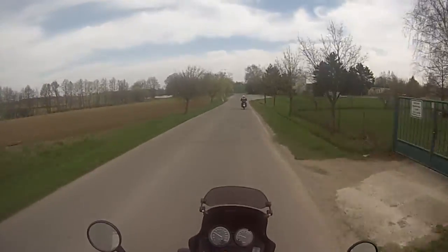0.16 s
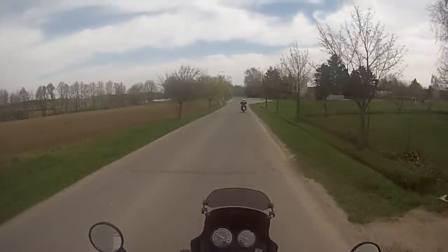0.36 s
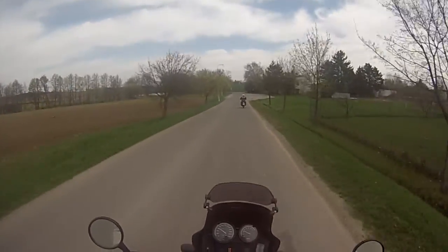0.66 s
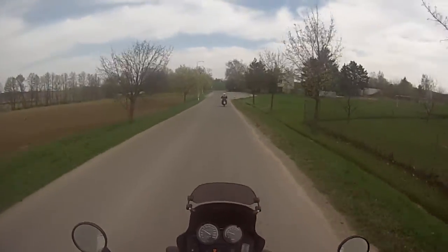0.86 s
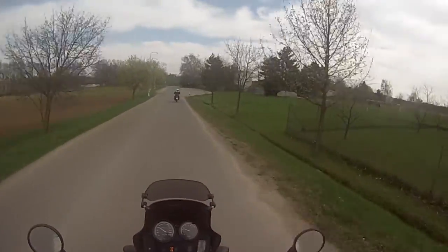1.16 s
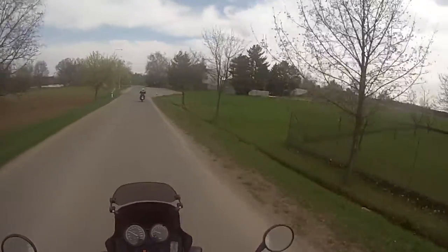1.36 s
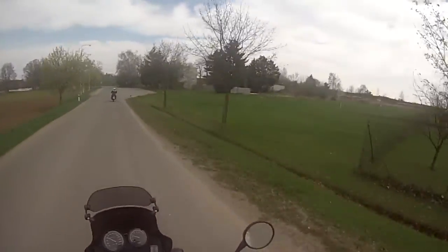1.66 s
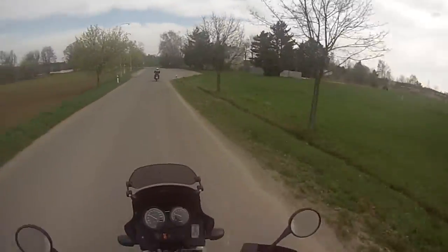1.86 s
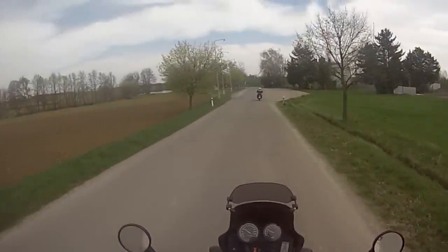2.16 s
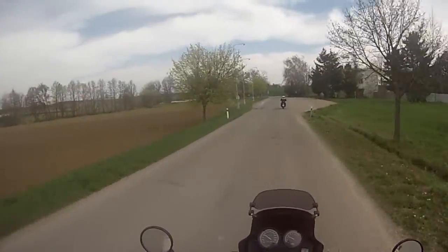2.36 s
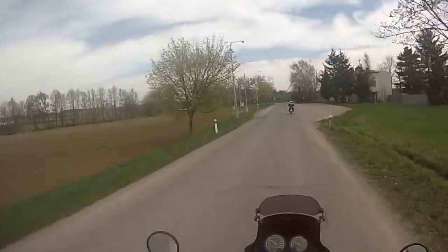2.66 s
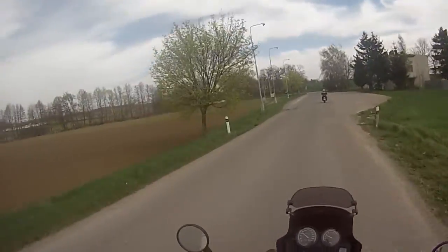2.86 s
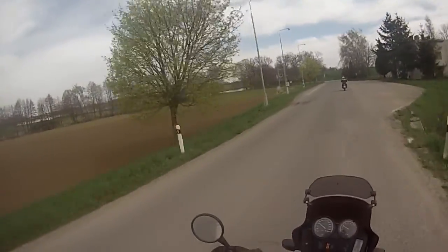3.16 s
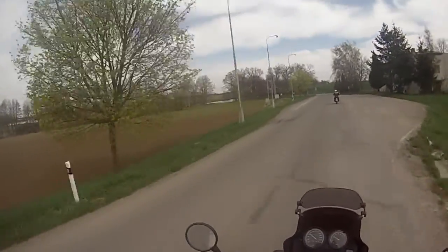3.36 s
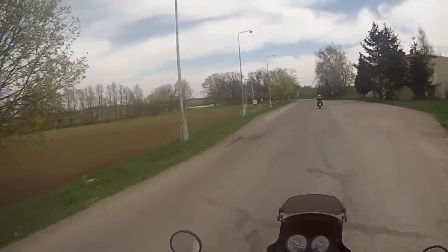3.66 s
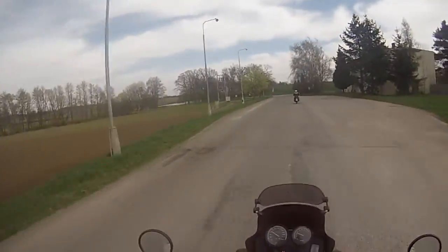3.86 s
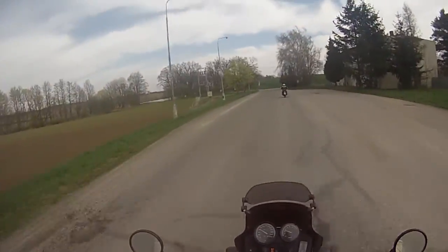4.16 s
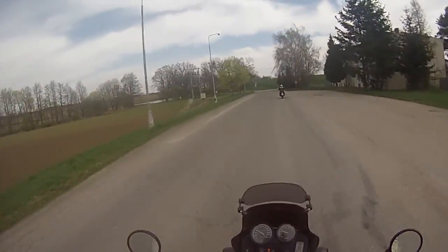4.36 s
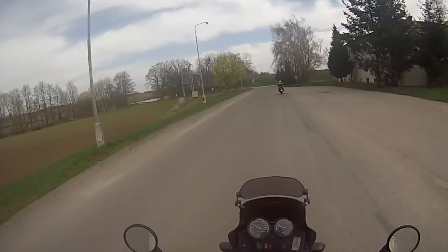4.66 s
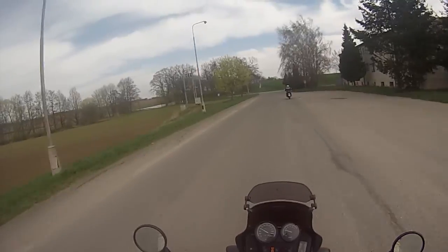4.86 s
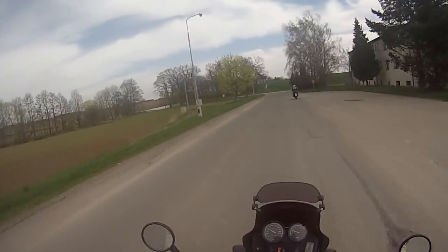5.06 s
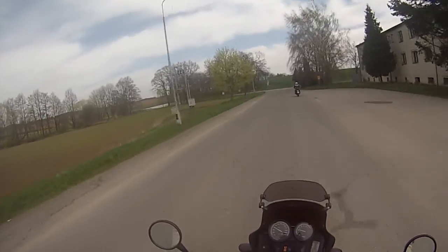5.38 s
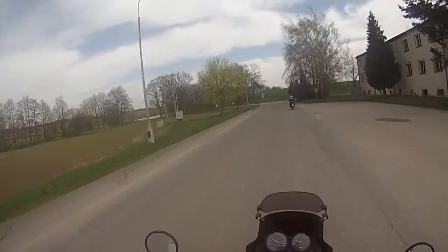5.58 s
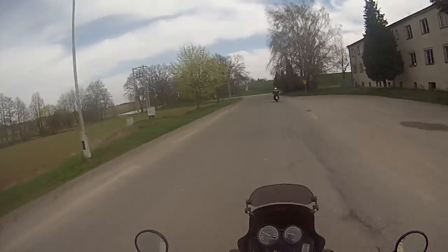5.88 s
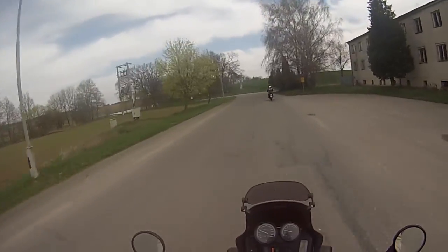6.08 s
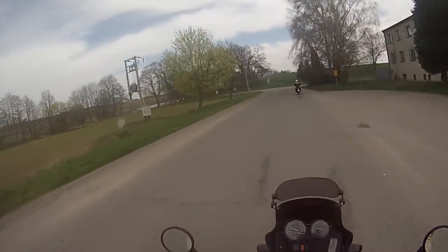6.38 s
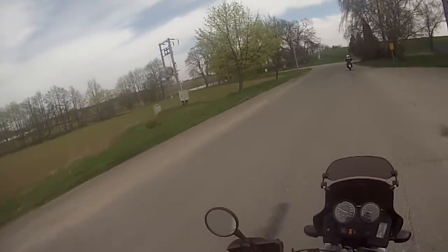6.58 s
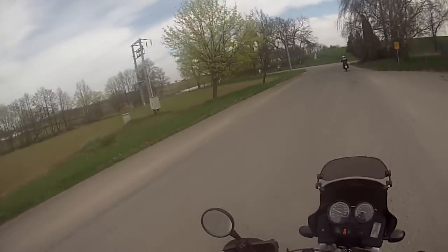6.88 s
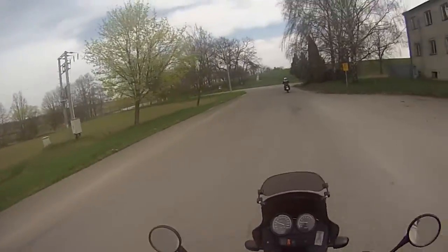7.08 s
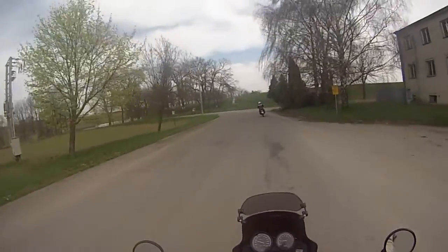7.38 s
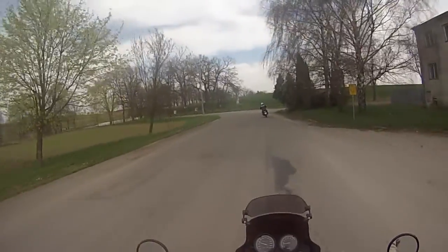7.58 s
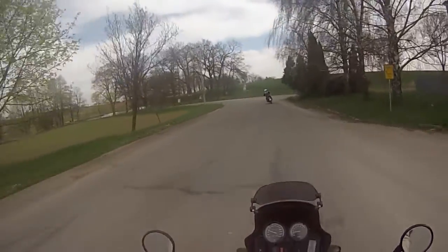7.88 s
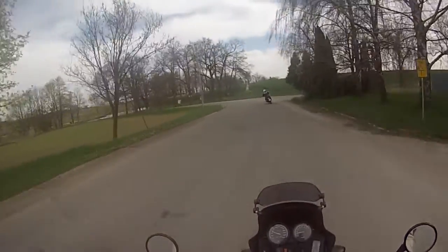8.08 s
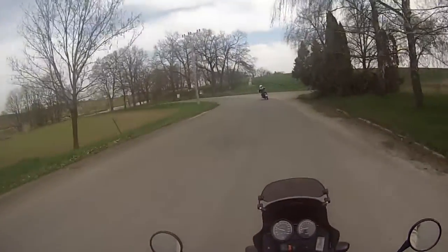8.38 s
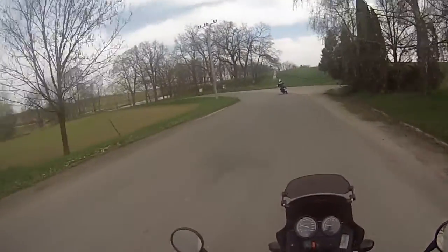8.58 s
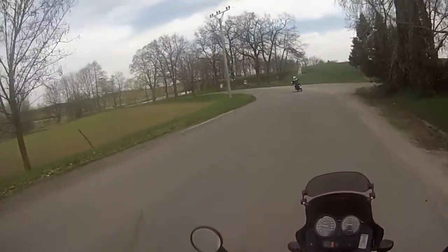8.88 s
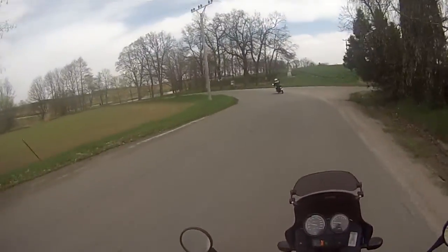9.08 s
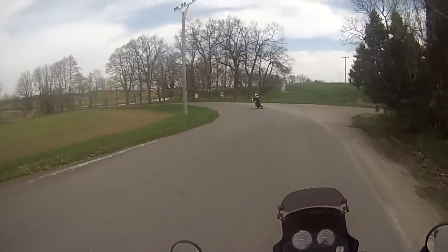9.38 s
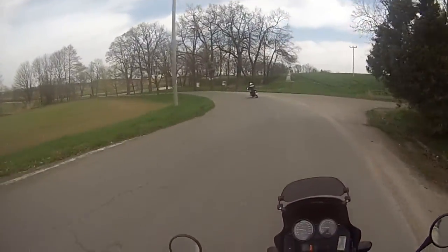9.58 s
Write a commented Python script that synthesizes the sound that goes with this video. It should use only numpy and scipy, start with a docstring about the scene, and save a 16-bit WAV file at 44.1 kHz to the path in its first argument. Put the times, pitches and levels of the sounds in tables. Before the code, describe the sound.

Close up on a moving motorcycle, a deep uneven engine drone around a low hum merges with booming, fluttering wind. Air roars, rushes and whistles breathily over the microphone, strongest in the first four seconds. A brief dull clatter jolts the mount around three and a half seconds. The airflow then weakens as the bike slows for a bend, though low gusts keep thumping. Open rural road, no echo.

```python
"""A motorcycle cruises along a country road, heard close up from a camera riding along in the airstream.
Uneven firings and wind buffets ring one deep resonance, with noise rumbling and flapping around it.
Air rushes and whistles round the camera case and hisses through its narrow resonances, all shaped noise,
easing as the bike slows for a bend. A knock rings short modes; a few faint squeaks are thin sine tones."""
import sys
import numpy as np
from scipy import signal
from scipy.fft import rfft, irfft, next_fast_len
from scipy.io import wavfile
from scipy.ndimage import uniform_filter1d

SR = 44100
rng = np.random.default_rng(int(sys.argv[2]) if len(sys.argv) > 2 else 0)


def put_to_file(sound):
    """Save the sound as 16-bit audio at rate SR, in the file named by the first command-line argument."""
    columns = np.atleast_2d(sound).T  # one column per channel
    safe = np.clip(columns, -1, 1)
    whole_steps = np.round(safe * 32767)
    wavfile.write(sys.argv[1], SR, whole_steps.astype(np.int16))


N = 429093

# strength of the big eddies that buffet the camera: time_s, drive_db
WAKE = [(0.0, 3.5), (1.45, 5.0), (2.25, 1), (2.65, 5), (2.95, 2.7), (3.55, 4.5), (4.4, -2), (4.6, -10),
        (4.9, -6.5), (5.2, 2), (6.1, -4), (7.5, -3.1), (8.1, 2.5), (8.6, -4.5), (9.73, -5)]
# gusts, some boom and some flap higher up: peak_s, length_s, boom_lift_db, buffet_lift_db
GUSTS = [(0.35, .1, 3.5, 3), (0.61, .11, 7.5, -3), (0.91, .12, 0.5, 3), (1.17, 0.086, 7.5, 1),
         (1.43, .07, 3.5, 2), (1.49, 0.1, 3, 7), (1.89, 0.19, 4, 0), (1.99, 0.075, 5.5, 10),
         (2.26, 0.078, 6, -8), (2.67, 0.3, 5.5, 4.5), (3.2, .09, 4, 5.5), (3.54, 0.19, 1, 8.5),
         (4.01, 0.32, 5, -4), (4.42, 0.23, 2, -1), (4.92, 0.15, 6, -2), (5.13, 0.12, 6.5, -3),
         (5.67, 0.14, 0, 6), (6.2, 0.2, 0, 5), (6.48, 0.2, 6, 4), (6.61, 0.15, 9.5, 0), (6.7, 0.14, 7, 6.5),
         (6.96, 0.17, 7.5, 3.5), (7.31, 0.1, 5, 5.5), (7.64, .17, 6.5, 3), (7.9, .05, 2, 8),
         (8.02, 0.11, 7, 5), (8.12, .07, 5, -1), (8.22, .13, 6.5, -2), (8.33, 0.07, 4, 0),
         (8.45, .08, 8.5, -2), (8.78, 0.15, 1, 8.5), (8.98, 0.1, 9.5, 0), (9.14, 0.23, 5, 0.5),
         (9.33, 0.25, 2.5, 7.5)]
# lulls, where the bass mostly drops for a moment: centre_s, length_s, change_db
LULLS = [(1.31, 0.058, -6), (2.44, 0.19, -2), (2.86, .12, -3), (3.3, .12, -4), (3.8, .14, -6),
         (4.25, 0.089, -19), (5.56, 0.11, -5), (5.73, .08, -4), (6.09, .08, -4), (6.85, 0.21, -6),
         (7.43, 0.2, -4), (7.76, 0.15, -1), (8.38, 0.075, -10), (8.6, .16, 2), (8.87, 0.092, -10),
         (9.05, .07, -9)]
# strength of the airflow over the case, shared by all its voices: time_s, drive_db
FLOW = [(0.0, 2.5), (1.3, 7), (1.75, 4), (2.4, 4), (2.68, 5.5), (2.92, 3.5), (3.15, 5.5), (3.5, 5.2),
        (3.75, 1), (4.2, 1), (4.9, -2.3), (5.27, 0.9), (5.95, -7.5), (6.42, -6.5), (6.78, -6), (7.3, -2.5),
        (7.46, -6.2), (7.54, -1.5), (8.15, -2), (8.6, -4), (9.2, -4.0), (9.73, -7)]
# puffs that strengthen the airflow, and slack moments that weaken it: peak_s, length_s, change_db
PUFFS = [(0.14, 0.19, 3), (1.33, .14, 1), (1.95, 0.23, 5), (2.42, 0.1, -2.5), (4.0, .08, 2.5),
         (4.5, 0.15, -2), (4.7, 0.18, 1), (5.06, 0.11, 2.5), (5.79, 0.13, 3), (6.48, .08, 1),
         (6.53, .06, -3), (6.63, 0.18, 2), (6.78, .1, -2), (6.97, .17, 2), (7.15, .08, -1.5),
         (7.26, .06, 1.5), (8.17, 0.14, 3.5)]
# edge whistle, which speaks when the air meets it at the right angle: time_s, level_db before its law
SLANT = [(0.0, -38.5), (0.9, -40), (1.6, -37.5), (2.0, -40), (2.3, -33), (2.6, -35.9), (3.75, -32),
         (4.15, -35), (5.1, -34), (5.75, -37), (6.1, -40), (8.2, -39.0), (9.73, -37)]
# thin ring from the gaps, which also wanders on its own: time_s, level_db before its law
THIN = [(0.0, -46), (0.3, -42.7), (0.8, -45.7), (1.4, -48), (1.8, -50.0), (3.15, -47.9), (3.6, -50.5),
        (5.2, -47), (5.65, -50.8), (6.15, -43.7), (6.75, -50.5), (7.4, -44.3), (8.5, -48), (9.73, -50.5)]

# colours of the airflow, relative density before levelling: pitch_hz, density_db (per Hz)
RUMBLE_COLOUR = [(12, -12), (26, -4.5), (45, -6), (72, -2.5), (100, -6), (150, -49)]
BUFFET_COLOUR = [(90, -13), (135, 0.5), (160, -0.5), (182, 2), (215, -4.5), (245, -9.5), (275, -10),
                 (330, -38), (600, -49)]
ROAR_COLOUR = [(200, 4.5), (290, 6), (410, 6.5), (460, 0), (700, -1.5), (920, -3.5), (1150, -4),
               (1700, -23)]
RUSH_COLOUR = [(850, -35), (1120, -8.5), (1250, -6.5), (1360, -1), (1610, 0), (1710, -5), (1860, -2.5),
               (2040, -10), (2620, -11.5), (2730, -15.5), (2800, -37), (3600, -29)]
SIZZLE_COLOUR = [(2000, -18), (2850, 1), (3300, -0.5), (3950, -0.5), (4350, -7), (4620, -2.5), (5200, -6.5),
                 (6000, -35)]
HISS_COLOUR = [(4000, -8.5), (5400, 2), (5900, 1.5), (6100, -3), (6550, -0.5), (7300, -6.5), (8150, -7.5),
               (8400, -9.5), (9000, -10), (9450, -15), (12000, -18.5), (13000, -26), (15000, -32)]
FLOOR_COLOUR = [(3000, 13), (9000, -13), (12000, -2), (13000, -9), (15000, -12)]  # steady fine hiss
# modes of the case, which colour the broad airflow: pitch_hz, width_hz, lift_db
CASE_MODES = [(387, 38, 3), (651, 50, 3.5), (812, 62, 7.5), (2681, 63, 10), (3870, 90, 4), (6140, 110, 1.5),
              (6500, 160, 2.5)]
# narrow resonances, relative to each other: pitch_hz, width_hz, level_db
BOOM_MODES = [(103, 23, 0)]
WHISTLE_MODES = [(2274, 335, 0)]
RING_MODES = [(4880, 31, -3), (4930, 43, -3.5), (5083, 144, 1), (5195, 91, -4.5), (5274, 160, -7.5)]

# blows of the knock from a bump: start_s, strength_db
KNOCK_BLOWS = [(3.5535, -17), (3.557, -13), (3.561, -20)]
# short modes that each blow rings: pitch_hz, level_db, t60_s
KNOCK_MODES = [(126, 3, 0.045), (220, 0, 0.011), (326, -4, 0.034), (620, -10, 0.019), (774, -5, 0.013),
               (1090, -2.5, 0.015), (1500, -3, 0.014), (1850, -10, .008), (4050, -16, .01)]
# faint high squeaks: start_s, pitch_hz, length_s, level_db
SQUEAKS = [(3.95, 9280, .07, -67), (4.61, 9280, .08, -65), (6.25, 9270, .07, -71), (6.56, 9450, .06, -68),
           (6.82, 9430, .06, -66), (7.03, 9400, .06, -66), (7.34, 9280, .09, -70), (8.07, 9280, .08, -66),
           (9.45, 13750, .06, -76), (9.64, 13650, .06, -77)]

# how each voice follows its drive: level_db at zero drive, slope_db_per_db
BOOM_LAW, RUMBLE_LAW, BUFFET_LAW = (-30.5, 0.9), (-34.7, 0.9), (-38.5, 0.75)
ROAR_LAW, RUSH_LAW = (-42.5, 0.83), (-36, 0.8)
SIZZLE_LAW, HISS_LAW = (-46.5, 0.97), (-52.65, 1.16)
WHISTLE_LAW, RING_LAW = (-3, 0.89), (-1, 1.28)  # levels added to SLANT and THIN

FIRING_HZ = 102.63  # centre of the firing rate
TOP_HZ = 15100  # upper limit of the camera's sound


def undb(db):
    """Decibels to gain."""
    return 10 ** (np.asarray(db) / 20)


def curve(table):
    """Join the points of a two-column table by straight lines in time."""
    time_s, value = np.transpose(table)
    return np.interp(np.arange(N) / SR, time_s, value)


def swells(table):
    """Add smooth rises and falls, one per row; return one dB curve per level column."""
    t = np.arange(N) / SR
    out = np.zeros((len(table[0]) - 2, N))
    for peak_s, length_s, *change_db in table:
        on = np.abs(t - peak_s) < length_s / 2
        bump = np.cos(np.pi * (t[on] - peak_s) / length_s) ** 2
        out[:, on] += np.outer(change_db, bump)
    return out


def follow(law, drive_db):
    """Level in dB of a voice that grows as a power of its drive."""
    level_db, slope = law
    return level_db + slope * drive_db


def unit(x):
    """Scale to rms 1."""
    return x / np.sqrt(np.mean(x ** 2))


def even(x, span_s):
    """Hold the rms near 1 over a short span, keeping the quicker flutter."""
    span = max(int(span_s * SR), 64)
    return x / np.sqrt(uniform_filter1d(x ** 2, span) + 1e-18)


def walk(rate_hz):
    """Draw random levels at a given rate and slide between them; rms 1."""
    step = max(int(SR / rate_hz), 2)
    held = np.repeat(rng.standard_normal(N // step + 1), step)
    return unit(uniform_filter1d(held, step)[:N])


def noise():
    """White noise, the raw turbulence."""
    return rng.standard_normal(N)


def shaped(x, response):
    """Filter by a gain that is a function of frequency."""
    size = next_fast_len(N)
    hz = np.maximum(np.arange(size // 2 + 1) * SR / size, 1)
    return irfft(rfft(x, size) * response(hz), size)[:N]


def ring(x, modes):
    """Sound steep resonances side by side: each band-pass acts twice."""
    def response(hz):
        return sum(undb(level_db) / (1 + 1j * (hz - pitch_hz * pitch_hz / hz) / width_hz) ** 2
                   for pitch_hz, width_hz, level_db in modes)
    return shaped(x, response)


def airflow(colour):
    """Turbulence of a given colour, lifted at the modes of the case; rms 1."""
    pitch_hz, density_db = np.transpose(colour)

    def response(hz):
        lift = sum(lift_db / (1 + (2 * (hz - centre_hz) / width_hz) ** 2)
                   for centre_hz, width_hz, lift_db in CASE_MODES)
        base = np.interp(np.log(hz), np.log(pitch_hz), density_db, left=-90, right=-90)
        return undb(base + lift)
    return unit(shaped(noise(), response))


def firings(wander=0.03, scatter_db=4):
    """One pulse per engine firing, uneven in timing (share of the rate) and strength; rms 1."""
    phase = np.cumsum(FIRING_HZ * (1 + wander * walk(25))) / SR
    pulses = np.diff(np.floor(phase), prepend=0)
    return unit(pulses * undb(scatter_db * walk(100)))


def boom(level_db, engine_db=-6):
    """Firings and wind buffets together ring the deep resonance; engine_db is firings against wind."""
    drive = noise() + undb(engine_db) * firings()
    return even(ring(drive, BOOM_MODES), span_s=0.084) * undb(level_db)


def rumble(level_db):
    """Big eddies roll past as deep noise."""
    return even(airflow(RUMBLE_COLOUR), span_s=0.073) * undb(level_db)


def buffets(level_db, flap_db=1.8):
    """Eddies flap at the camera: low noise with quick random changes of level."""
    return even(airflow(BUFFET_COLOUR), span_s=0.08) * undb(level_db + flap_db * walk(70))


def drone(rumble_share=0.3, lull_share=0.56, throb_db=2, rumble_flutter_db=1.5, buffet_flutter_db=1.33):
    """Boom, rumble and buffets ride on one wake; each takes its share of gusts and lulls."""
    wake = curve(WAKE)
    thud, flap = swells(GUSTS)
    lull, = swells(LULLS)
    boom_db = follow(BOOM_LAW, wake) + thud + lull + throb_db * walk(22)
    rumble_db = follow(RUMBLE_LAW, wake) + rumble_share * (thud + lull) + rumble_flutter_db * walk(14)
    buffet_db = follow(BUFFET_LAW, wake) + flap + lull_share * lull + buffet_flutter_db * walk(18)
    return boom(boom_db) + rumble(rumble_db) + buffets(buffet_db)


def roar_and_rush(flow, slant, roar_loss=0.43):
    """Air pours over the case; the roar loses dB per dB of slant as air turns to the whistling edge."""
    roar_db = follow(ROAR_LAW, flow) - roar_loss * slant
    rush_db = follow(RUSH_LAW, flow)
    return airflow(ROAR_COLOUR) * undb(roar_db) + airflow(RUSH_COLOUR) * undb(rush_db)


def edge_whistle(flow, edge_db, slant, swing=0.25, flutter_db=0.45):
    """Noise through one resonance whistles at an edge; swing adds dB per dB of slant."""
    level_db = follow(WHISTLE_LAW, flow) + edge_db + swing * slant + flutter_db * walk(14)
    return unit(ring(noise(), WHISTLE_MODES)) * undb(level_db)


def gap_ring(flow, flutter_db=1.0):
    """Air hisses through narrow resonances in the gaps of the case."""
    level_db = follow(RING_LAW, flow) + curve(THIN) + flutter_db * walk(20)
    return unit(ring(noise(), RING_MODES)) * undb(level_db)


def spray(flow):
    """The finest eddies sizzle and hiss, growing steeply with the flow."""
    sizzle = airflow(SIZZLE_COLOUR) * undb(follow(SIZZLE_LAW, flow))
    hiss = airflow(HISS_COLOUR) * undb(follow(HISS_LAW, flow))
    return sizzle + hiss


def wind(unrest_db=0.36, slow_flutter_db=0.5, quick_flutter_db=0.59, fine_flutter_db=0.19):
    """One flow drives every voice round the case, and its angle trades roar for whistle."""
    flow = curve(FLOW) + swells(PUFFS)[0] + unrest_db * walk(18)
    edge_db = curve(SLANT)
    slant = edge_db - edge_db.mean()
    broad = roar_and_rush(flow, slant) + edge_whistle(flow, edge_db, slant)
    # the finest eddies come and go on their own as well
    fine = (gap_ring(flow) + spray(flow)) * undb(fine_flutter_db * walk(20))
    together_db = slow_flutter_db * walk(26) + quick_flutter_db * walk(120)
    return (broad + fine) * undb(together_db)


def steady_hiss(level_db=-68):
    """A faint fine hiss of constant level lies under the ride."""
    return undb(level_db) * airflow(FLOOR_COLOUR)


def knock(soft_hz=3000):
    """A bump jolts the mount: a quick clatter of cushioned blows into short decaying modes."""
    t = np.arange(SR // 10) / SR
    body = np.zeros(len(t))
    for k, (pitch_hz, level_db, t60_s) in enumerate(KNOCK_MODES):
        decay = undb(level_db - 60 * t / t60_s)
        # neighbouring modes swing in opposite directions
        body += (-1) ** k * decay * np.sin(2 * np.pi * pitch_hz * t)
    blows = np.zeros(N)
    for start_s, strength_db in KNOCK_BLOWS:
        blows[int(start_s * SR)] += undb(strength_db)
    rung = signal.fftconvolve(blows, body)[:N]
    return shaped(rung, lambda hz: 1 / (1 + 1j * hz / soft_hz) ** 2)


def squeaks(waver=0.003):
    """Thin sine tones start quickly and fade, their pitch wavering by a small share."""
    t, out = np.arange(N) / SR, np.zeros(N)
    clock = np.cumsum(1 + waver * walk(150)) / SR
    for start_s, pitch_hz, length_s, level_db in SQUEAKS:
        on = (t > start_s) & (t < start_s + length_s)
        swell = np.sin(np.pi * np.sqrt((t[on] - start_s) / length_s))
        out[on] += undb(level_db) * swell * np.sin(2 * np.pi * pitch_hz * clock[on])
    return out


def scene():
    """Everything meets at one microphone, on the riding camera."""
    return (drone() + wind() + steady_hiss() + knock() + squeaks())[None]


def record(dry):
    """The camera cuts the top with a steep low-pass; the sound opens and closes over 4 ms."""
    from_start = np.arange(N)
    to_nearest_end = np.minimum(from_start, from_start[::-1])
    ramp = np.minimum(1, to_nearest_end / (0.004 * SR))
    low_pass = signal.ellip(10, 0.2, 80, TOP_HZ, fs=SR, output="sos")
    return ramp * signal.sosfilt(low_pass, dry)


dry = scene()
out = record(dry)
put_to_file(out)
```